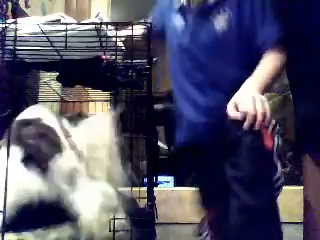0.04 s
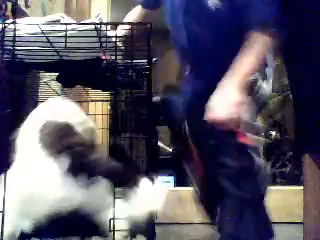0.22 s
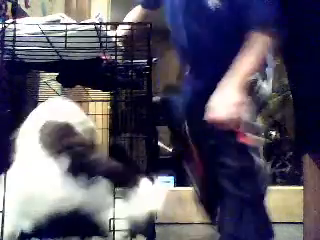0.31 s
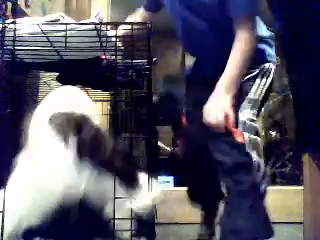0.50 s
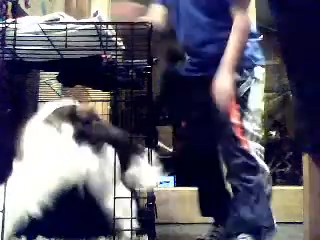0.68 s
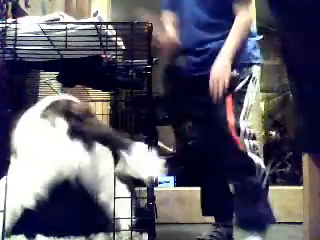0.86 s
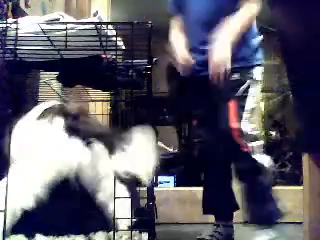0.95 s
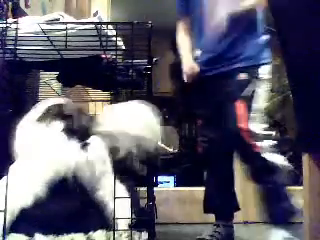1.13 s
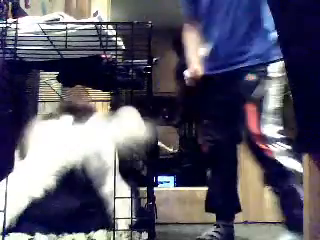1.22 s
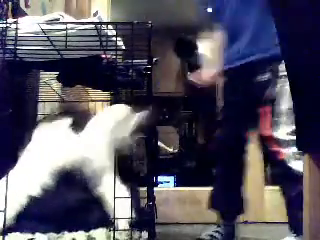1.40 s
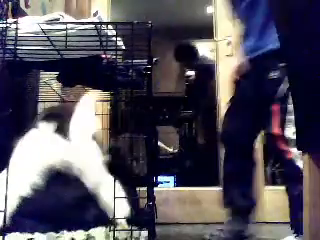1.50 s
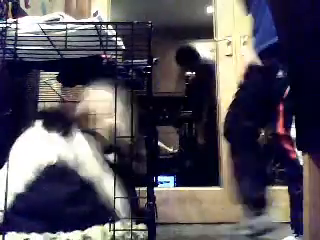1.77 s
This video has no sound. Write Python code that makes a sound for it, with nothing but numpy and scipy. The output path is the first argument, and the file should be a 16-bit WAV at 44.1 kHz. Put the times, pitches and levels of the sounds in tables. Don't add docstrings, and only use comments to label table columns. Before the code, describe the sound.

A wire dog crate knocks, skids with a harsh rattle, then bangs hard and jangles briefly indoors

```python
import sys
import numpy as np
from scipy import signal
from scipy.fft import rfft, irfft, next_fast_len
from scipy.io import wavfile
from scipy.ndimage import uniform_filter1d, map_coordinates

SR = 44100
rng = np.random.default_rng(int(sys.argv[2]) if len(sys.argv) > 2 else 0)


def attenuation_scalar(level_db):
    decades = np.asarray(level_db, float) / 20
    return 10 ** decades


def unload_audio(sound):
    columns = np.transpose(np.atleast_2d(sound))
    steps = np.round(np.clip(columns, -1, 1) * 32767)
    wavfile.write(sys.argv[1], SR, steps.astype(np.int16))


N = 79380
TIME = np.arange(N) / SR

# start_s, effort_db, slip_pitch_hz, ring_share_db
SKID_PATH = [(.222, -34.5, 1900, -6), (0.233, -22, 1940, -1), (0.26, -8, 1666, -5), (0.299, -7, 1170, 1),
             (0.353, -9, 835, 0.5), (0.402, -12, 1010, -6), (0.451, -20.5, 1100, -9.5),
             (.461, -37.5, 1197, -13)]
# pitch_hz, width_hz, level_db (over the body)
SLIDING_WIRES = [(814, 12, -4), (1050, 14, 2.5), (1405, 24, -9.5), (1604, 17, -2), (2045, 32, -9),
                 (3330, 100, -3), (4350, 58, -9.5)]
# pitch_hz, width_hz, level_db (over the body)
STRUCK_WIRES = [(265, 54, -1), (657, 53, -0.5), (957, 11, -8.5), (1722, 65, 1.5), (2080, 7, -17),
                (2878, 44, -0.5), (3814, 34, -3.5), (5140, 54, -7)]
# freq_hz, level_db (per Hz)
SLIDING_BODY = [(35, -21), (180, -21.5), (270, -13), (400, -17.5), (650, -7.5), (2000, -8), (5000, -18),
                (16000, -27)]
# freq_hz, level_db (per Hz)
FABRIC = [(300, 0.5), (1200, 7), (2000, -5), (3600, 3), (5000, -8), (7000, -23)]


def unit(x):
    return x / np.sqrt(np.mean(x ** 2) + 1e-20)


def along(points, hz):
    freq_hz, value = np.transpose(points)
    return np.interp(np.log(hz + 1), np.log(freq_hz + 1), value)


def effort(rows):
    s, db = np.transpose(rows)[:2]
    times_s = np.r_[s[0] - 0.004, s, s[-1] + 0.02]
    return attenuation_scalar(np.interp(TIME, times_s, np.r_[-120, db, -120]))


def filtered(x, response):
    size = next_fast_len(N + SR // 2)
    freq_hz = np.fft.rfftfreq(size, 1 / SR)
    return irfft(rfft(x, size) * response(freq_hz), size)[:N]


def resonances(rows):
    def response(f):
        total = 0
        for k, (hz, width_hz, db) in enumerate(rows):
            loss = 1j * f * width_hz
            total = total + (-1) ** k * attenuation_scalar(db) * loss / (hz * hz - f * f + loss)
        return total
    return response


def coloured(x, curve):
    return filtered(x, lambda f: attenuation_scalar(along(curve, f)))


def contacts(spread_db, hiss):
    contacts_per_s = 6000
    hit = rng.random(N) < contacts_per_s / SR
    size = attenuation_scalar(spread_db * rng.exponential(size=N))
    clicks = unit(hit * size * rng.standard_normal(N))
    return unit(clicks + hiss * rng.standard_normal(N))


def rattle(drive, body, wires, ring_db):
    push = contacts(spread_db=1.9, hiss=0.83)
    ring = resonances(wires)
    sound = filtered(push, lambda f: attenuation_scalar(along(body, f)) * (1 + attenuation_scalar(ring_db) * ring(f)))
    return drive * unit(sound)


def blows(rows, crack, attack_s):
    out = np.zeros(N + SR)
    t = np.arange(SR // 8) / SR
    for s, db, hz, t60_s in rows:
        noise = rng.standard_normal(len(t))
        dull = unit(uniform_filter1d(noise, size=9) - uniform_filter1d(noise, size=50))
        burst = dull * attenuation_scalar(-60 * t / (0.61 * t60_s))
        ring = np.sin(2 * np.pi * hz * t) * attenuation_scalar(-60 * t / t60_s) * (1 - np.exp(-t / attack_s))
        out[round(s * SR):][:len(t)] += attenuation_scalar(db) * (ring + crack * burst)
    return out[:N]


def room():
    # freq_hz, level_db (per Hz)
    still_air = [(25, -21), (150, -14.5), (215, -1.5), (320, -5.5), (1200, -9.5), (1500, -12.5),
                 (4000, -16.5), (16000, -23)]
    # pitch_hz, width_hz, level_db (rms)
    fan = [(1167, 7, -69), (314, 25, -68), (630, 30, -72), (4402, 5, -79), (3773, 5, -82), (2336, 6, -82)]
    level_db, sway_db, sways_per_s = -54, 0.8, 25
    sway = map_coordinates(rng.standard_normal(60), [TIME * sways_per_s])
    out = unit(coloured(rng.standard_normal(N), still_air)) * attenuation_scalar(level_db + sway_db * sway)
    for hz, width_hz, db in fan:
        tone = filtered(rng.standard_normal(N), resonances([(hz, width_hz, 0)]))
        out += attenuation_scalar(db) * unit(tone)
    return out


def cloth():
    # centre_s, half_length_s, level_db
    rustles = [(.03, 0.05, -58), (0.186, 0.081, -55), (0.653, 0.12, -51), (0.92, 0.071, -54.5),
               (1.098, 0.058, -52.5), (1.19, 0.033, -58), (1.408, 0.083, -58), (1.68, 0.025, -61.5)]
    swell = sum(attenuation_scalar(db) * np.exp(-((TIME - s) / half_s) ** 2) for s, half_s, db in rustles)
    return swell * unit(coloured(contacts(spread_db=0.0, hiss=0.57), FABRIC))


def paw():
    # time_s, effort_db
    scuffle = [(.097, -54), (.1, -41.5), (.112, -34), (.123, -29.5), (.135, -28.5), (.142, -52.5),
               (.165, -45.5)]
    # freq_hz, level_db (per Hz)
    tray = [(35, -34), (170, -17.5), (260, -7), (560, -3.5), (1000, -4.5), (2000, -10), (4500, -16),
            (16000, -33.5)]
    return rattle(effort(scuffle), tray, STRUCK_WIRES, ring_db=4)


def knocks():
    # start_s, peak_db, pitch_hz, t60_s
    hard_contacts = [(.0986, -32, 910, 0.019), (.1217, -4.5, 1410, 0.0046), (.2298, -20, 2030, 0.0068),
                     (.2575, 0, 1685, .012), (.5266, -17, 1370, 0.0072), (.5505, -14.5, 1110, 0.013),
                     (.5565, -10, 1170, 0.014), (.6895, 7, 3490, 0.0067), (.7495, -3, 990, .012),
                     (1.1025, -44, 1080, 0.031), (1.3375, -41.5, 1340, 0.019), (1.344, -40, 1780, 0.018),
                     (1.4372, -38.5, 1200, 0.0162), (1.655, -35.5, 4100, 0.0059), (1.785, -35, 4350, 0.011),
                     (1.789, -32, 3130, 0.018)]
    return blows(hard_contacts, crack=0.42, attack_s=0.00022)


def thuds():
    start_s = [.113, .117, .268, .278, .29, .316, .331, .349, .365, .691, .692, .71, .742, .765, 1.105,
               1.371, 1.784, 1.785, 1.787]
    # peak_db, pitch_hz, t60_s
    frame_rings = [(-21, 250, .07), (-23, 560, .04), (-11, 2070, .1), (-8, 1040, .05), (-15, 269, .15),
                   (-8, 835, .09), (-8, 848, .09), (-6, 840, .09), (-8, 848, .07), (2, 645, .09),
                   (-5, 269, .11), (-10, 269, .06), (-11, 690, .1), (-16, 660, .15), (-50, 231, .08),
                   (-47, 280, .08), (-31, 480, .07), (-39, 260, .06), (-35, 850, .04)]
    return blows(np.c_[start_s, frame_rings], crack=0.037, attack_s=0.0026)


def slips():
    s, db, hz, share_db = np.transpose(SKID_PATH)
    grains = 110
    draw = rng.random((grains, 2))
    t = np.arange(900) / SR
    when_s = s[0] + (s[-1] - s[0]) * (np.arange(grains) + draw[:, 0]) / grains
    pitch_hz = np.interp(when_s, s, hz) * np.exp(0.14 * rng.standard_normal(grains))
    size = attenuation_scalar(np.interp(when_s, s, db + share_db) - 13 * draw[:, 1])
    tone = np.sin(2 * np.pi * pitch_hz[:, None] * t)
    decay = np.exp(-t * pitch_hz[:, None] / 4.5)
    attack = 1 - np.exp(-t / 0.00027)
    ring = size[:, None] * tone * decay * attack
    at = (when_s * SR).astype(int)[:, None] + np.arange(len(t))
    return np.bincount(at.ravel(), ring.ravel(), N)[:N]


def skid():
    heft_hz, heft_db_per_octave = 1100, 15
    dulling = 0.4
    lumps_per_s, lumps_db = 110, 1.4
    s, _, hz, _ = np.transpose(SKID_PATH)
    body = rattle(np.ones(N), SLIDING_BODY, SLIDING_WIRES, ring_db=12)
    lows = filtered(body, lambda f: 1 / (1 + (f / heft_hz) ** 4))
    heft = attenuation_scalar(-heft_db_per_octave * np.log2(np.interp(TIME, s, hz) / heft_hz))
    lumps = attenuation_scalar(lumps_db * map_coordinates(rng.standard_normal(400), [TIME * lumps_per_s]))
    weighted = heft * lows + (body - lows) / heft ** dulling
    return effort(SKID_PATH) * lumps * weighted + slips()


def shudder():
    # time_s, effort_db
    shaking = [(.462, -36), (.484, -33.5), (.505, -45), (.524, -37.5), (.528, -29.5), (.556, -25),
               (.574, -32), (.579, -41.5), (.62, -53.5)]
    return rattle(effort(shaking), SLIDING_BODY, SLIDING_WIRES, ring_db=6.5)


def bang():
    # time_s, effort_db
    jangle = [
        (.681, -38),
        (.686, -18),
        (.689, -26.5),
        (.6905, 0),
        (.705, -4.5),
        (.73, -10.5),
        (.79, -19.5),
        (.804, -21),
        (.82, -37),
        (.87, -46.5),
    ]
    # freq_hz, level_db (per Hz)
    struck_body = [(35, -29.5), (170, -16), (280, -11.5), (480, -10.5), (800, -5), (3200, -12.5),
                   (6000, -17.5), (16000, -33.5)]
    return rattle(effort(jangle), struck_body, STRUCK_WIRES, ring_db=8.5)


def shift():
    # time_s, effort_db
    movement = [(1.772, -58), (1.783, -53), (1.788, -46), (1.8, -50)]
    return rattle(effort(movement), FABRIC, STRUCK_WIRES, ring_db=2.5)


def walls(x):
    t60_s, level_db, gap_s = 0.22, -30, 0.004
    t = np.arange(SR // 3) / SR
    tail = rng.standard_normal(len(t)) * attenuation_scalar(-60 * t / t60_s) * (t > gap_s)
    return attenuation_scalar(level_db) * signal.fftconvolve(x, tail / np.linalg.norm(tail))[:N]


def scene():
    crate = paw() + knocks() + thuds() + skid() + shudder() + bang() + shift()
    return (room() + cloth() + crate + walls(crate))[None]


def roll_off(x):
    return signal.sosfilt(signal.butter(12, 16800, fs=SR, output="sos"), x)


def record(dry):
    mic_hz, mic_order = 6600, 9.15
    clip_top, clip_hardness = 0.715, 12
    lopsided, edge_hz = 0.067, 8300
    x = filtered(dry[0], lambda f: 1 / np.sqrt(1 + (f / mic_hz) ** (2 * mic_order)))
    x = x / (1 + np.abs(x / clip_top) ** clip_hardness) ** (1 / clip_hardness)
    x = x + lopsided * x ** 2
    mix = filtered(x, lambda f: (f > 20) * (f < 15800) / np.sqrt(1 + (f / edge_hz) ** 4))[None]
    return roll_off(mix)


dry = scene()
out = record(dry)
unload_audio(out)
```